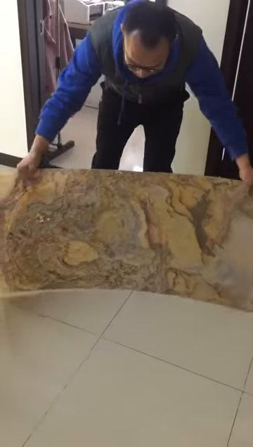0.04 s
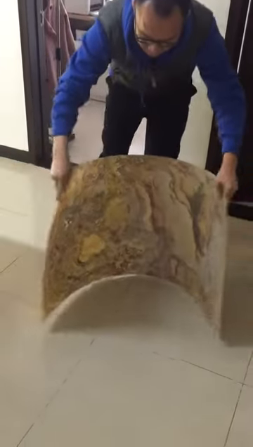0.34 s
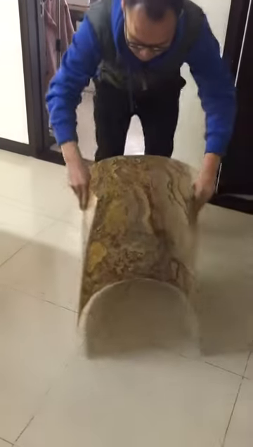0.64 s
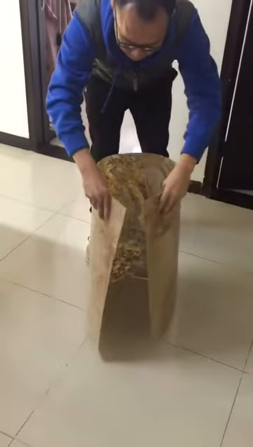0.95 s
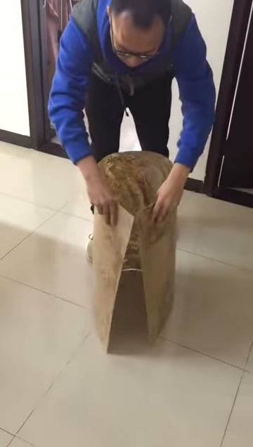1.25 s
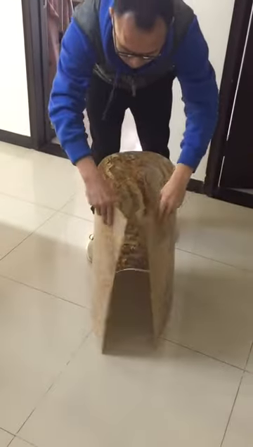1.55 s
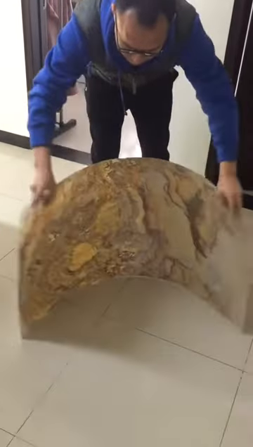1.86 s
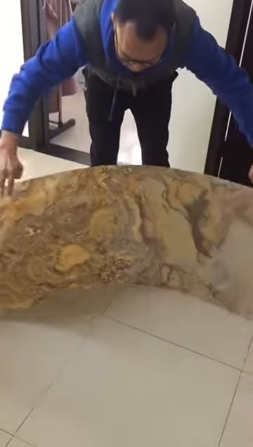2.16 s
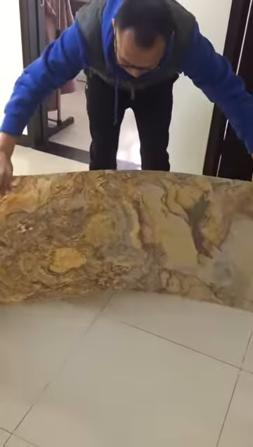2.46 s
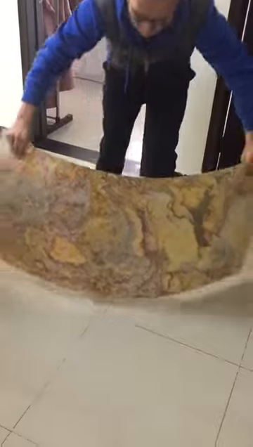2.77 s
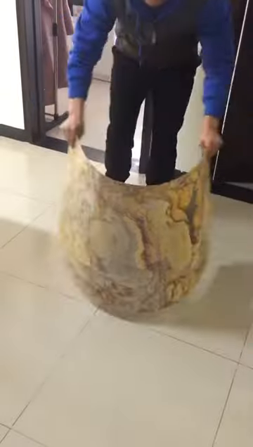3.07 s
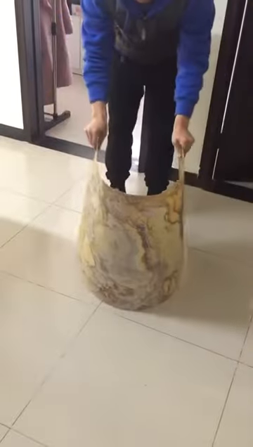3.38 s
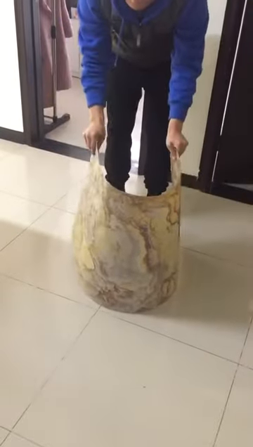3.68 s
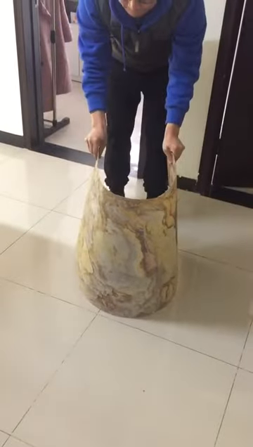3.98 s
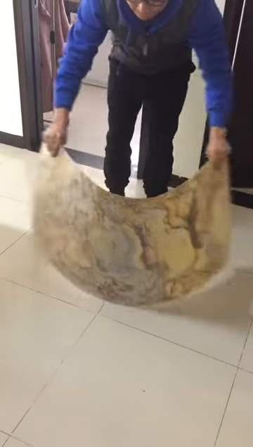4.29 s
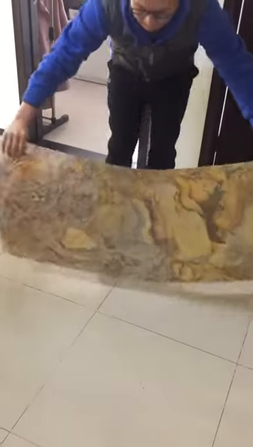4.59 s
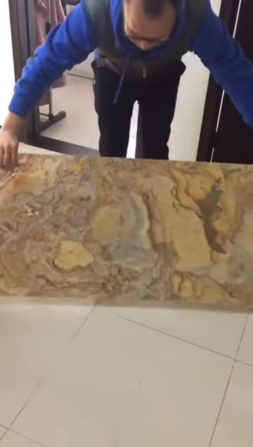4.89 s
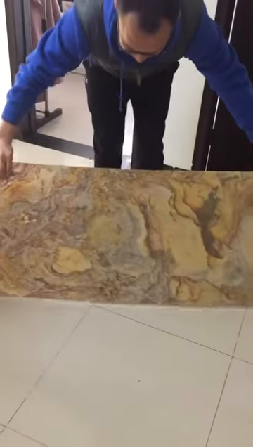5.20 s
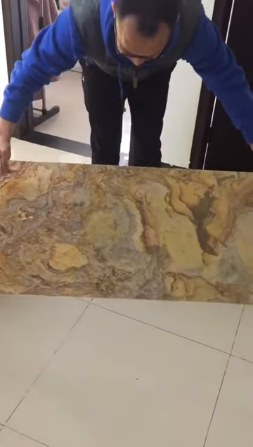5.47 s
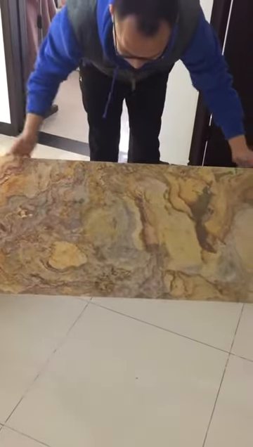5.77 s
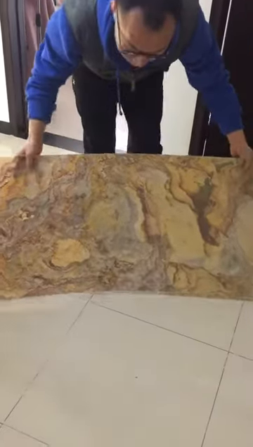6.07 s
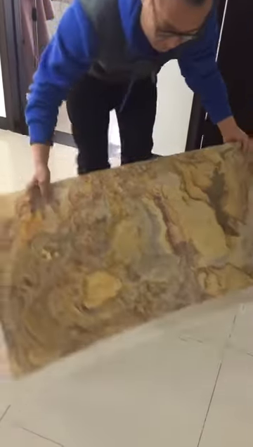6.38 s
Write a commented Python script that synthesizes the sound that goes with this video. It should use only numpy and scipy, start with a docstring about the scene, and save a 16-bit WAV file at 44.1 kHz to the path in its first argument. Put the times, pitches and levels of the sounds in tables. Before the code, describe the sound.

A thin sheet of stone veneer is bent by hand and slaps against itself, then unbends in a dense run of snaps, crackles and dull flops. After a low push of air comes one loud, ringing clack. Softer crackles, light scrapes and a knock on the tiles follow as it is laid flat. Everything is heard from across a hard, reverberant room.

```python
"""A thin sheet of stone veneer is bent into an arch, opened, bent the other way and laid flat.
It buckles with sharp snaps and soft flops, slaps against itself, crackles while it unbends,
and pushes air as it sways. Its edge scrapes and knocks on the tiles, hands slide on it,
and both the sheet and the hard, tiled room ring after every snap."""
import sys
import numpy as np
from scipy import signal
from scipy.fft import rfft, irfft
from scipy.io import wavfile

SR = 44100
rng = np.random.default_rng(int(sys.argv[2]) if len(sys.argv) > 2 else 0)


def master_out(mix):
    """Clip the mix to full scale and print it as 16-bit PCM to the path in sys.argv[1]."""
    frames = np.transpose(np.atleast_2d(mix))
    ceiling = np.clip(frames, -1, 1)
    pcm = np.round(ceiling * 32767).astype(np.int16)
    wavfile.write(sys.argv[1], SR, pcm)


N = 288414


def amp(db):
    """Turns decibels into a gain."""
    return 10 ** (np.asarray(db) / 20)


def unit(x):
    """Scales a signal to an average (rms) level of one."""
    return x / np.sqrt(np.mean(x ** 2) + 1e-20)


def read(points, hz):
    """Looks up a table by pitch, drawing smooth lines between its rows."""
    row_hz, value = np.transpose(points)
    return np.interp(np.log(hz + 1), np.log(row_hz + 1), value)


def colour(x, spectrum):
    """Shapes the bass and treble of a signal, at an rms level of one."""
    gain = amp(read(spectrum, np.fft.rfftfreq(len(x), 1 / SR)))
    return unit(irfft(rfft(x) * gain, len(x)))


def add(mix, start_s, sound):
    """Mixes a sound in at its start time."""
    part = mix[max(round(start_s * SR), 0):][:len(sound)]
    part += sound[:len(part)]


def grains(per_s, spread_db):
    """Random clicks of uneven size."""
    size = amp(spread_db * np.minimum(rng.exponential(1, N), 3))
    return size * rng.choice([-1, 1], N) * (rng.random(N) < per_s / SR)


def resonate(x, hz, width_hz):
    """A resonance that follows a changing pitch."""
    turn = np.exp(2j * np.pi * np.cumsum(hz) / SR)
    decay = np.exp(-np.pi * width_hz / SR)
    return (turn * signal.lfilter([1 - decay], [1, -decay], x / turn)).real


def burst(fade_s, size=4096):
    """Dying noise with an energy of one. A fade_s is always the time to fall by 60 dB."""
    noise = rng.standard_normal(size) * amp(-60 * np.arange(size) / SR / fade_s)
    return noise / np.linalg.norm(noise)


def pulse(spectrum):
    """The shortest sudden pulse with this two-sided spectrum, at an energy of one."""
    log_gain = np.log(spectrum / spectrum.max() + 1e-5)
    wave = np.fft.ifft(np.exp(np.conj(signal.hilbert(log_gain)))).real
    return wave / np.linalg.norm(wave)


def unevenness(depth_db, per_s):
    """A gain that catches and slips at random."""
    points = rng.standard_normal(1000)
    return amp(depth_db * np.interp(np.arange(N) * per_s / SR, np.arange(len(points)), points))


def swell(peak_s, rise_s, fall_s, down_db=-24.5):
    """A movement swells and fades; it is at down_db rise_s before its peak and fall_s after."""
    t, gain = np.arange(N) / SR - peak_s, np.zeros(N)
    on = (t > -2 * rise_s) & (t < 2 * fall_s)
    before = np.maximum(-t[on] / rise_s, 0) ** 1.38
    after = np.maximum(t[on] / fall_s, 0) ** 0.84
    gain[on] = amp(down_db * (before + after))
    return gain


def sliding(trim_db=-4, climb_octaves_per_s=1.7):
    """The edge and hands slide in tiny slips, with a rising tone and clumps of fizzing grit."""
    # each slide; tone_db is relative to its scrape:
    # peak_s, rise_s, fall_s, scrape_db, grit_db, tone_hz, tone_db, width_hz
    slides = [ (0.061, 0.16, 0.14, -40.5, -53, 1820, -36, 970),
              (1.18, 0.24, 0.19, -62.5, -66, 1960, 10, 1210),
              (1.41, 0.2, 0.052, -48.5, -79, 1901, 0, 952.6),
              (1.705, 0.063, 0.08, -31.5, -56, 1970, -4, 960),
              (1.94, 0.13, 0.35, -36.5, -50, 1700, -18, 940),
              (2.133, 0.053, 0.34, -43, -54, 1500, -4.5, 950),
              (2.345, 0.058, 0.22, -44.5, -51, 1530, -30, 960),
              (2.479, 0.071, 0.11, -57, -51.5, 1600, -5, 950),
              (3.079, 0.032, 0.036, -43.5, -60, 1640, -7.5, 700),
              (3.155, 0.038, 0.038, -51.5, -57, 2933, -5, 946),
              (4.088, 0.51, 0.85, -54, -86, 2260, -11, 705),
              (4.236, 0.089, 0.14, -48.5, -60.5, 1390, 2, 594),
              (4.42, 0.19, 0.2, -56.5, -64.5, 1630, -9, 200),
              (4.53, 0.092, 0.069, -42, -63, 1957, -0.5, 320),
              (4.604, 0.065, 0.042, -40.5, -54, 2290, -1, 910),
              (4.605, 0.018, 0.03, -39.5, -50.5, 3080, -2, 1510),
              (5.464, 0.026, 0.081, -33.5, -55, 1200, -9, 1000),
              (6.009, 0.094, 0.13, -44.5, -62, 1460, -25, 940),
              (6.465, 0.073, 0.12, -58.5, -83, 1117, -14, 950)]
    # tone of the scrape: pitch_hz, level_db
    scrape_tone = [(70, -11.5), (160, 4.5), (400, 1), (900, 4), (1600, -1.5), (2400, -6), (4000, -21),
                   (7000, -36.5), (12000, -80)]
    # tone of the grit: pitch_hz, level_db
    fizz_tone = [(1500, -16.5), (3000, 10.5), (4500, 3.5), (6000, 5), (7500, -0.5), (9500, 1.5),
                 (12000, -5.5)]
    t, out = np.arange(N) / SR, np.zeros(N)
    slips = grains(per_s=2500, spread_db=-3)
    grit = grains(per_s=1500, spread_db=5.5) * unevenness(depth_db=3.6, per_s=90)
    scrape, fizz = colour(slips, scrape_tone), colour(grit, fizz_tone)
    for peak_s, rise_s, fall_s, scrape_db, grit_db, tone_hz, tone_db, width_hz in slides:
        on = (t > peak_s - 2 * rise_s) & (t < peak_s + 2 * fall_s)
        edge_hz = tone_hz * 2 ** (climb_octaves_per_s * (t[on] - peak_s))
        tone = unit(resonate(resonate(slips[on], edge_hz, width_hz), edge_hz, width_hz))
        rub = amp(scrape_db) * (scrape[on] + amp(tone_db) * tone)
        out[on] += swell(peak_s, rise_s, fall_s)[on] * (rub + amp(grit_db) * fizz[on])
    return amp(trim_db) * out


def air(quiet_db=-59):
    """The swaying sheet gives a low push of air over the quiet of the building."""
    # each sway: peak_s, rise_s, fall_s, level_db
    sways = [(0.18, 0.4, 0.25, -47.5), (2.2, 0.33, 0.46, -42), (2.5, 0.43, 0.6, -45.5),
             (2.768, 0.057, 0.14, -28.5), (2.998, 0.11, 0.38, -53.5), (3.512, 0.017, 0.24, -44),
             (5.48, 0.057, 0.069, -42), (6.04, 0.099, 0.2, -42), (6.351, 0.54, 0.33, -57.5)]
    # tone of the pushed air: pitch_hz, level_db
    push_tone = [(20, -22.5), (42, 9), (62, -8.5), (85, 15), (110, 5), (150, 4), (220, -13), (400, -10.5),
                 (1000, -87.5)]
    # tone of the quiet building: pitch_hz, level_db
    quiet_tone = [(15, -42.5), (25, -11), (68, -11.5), (101, 2), (208, -8.5), (475, -18), (555, -18),
                  (682, -19), (883, -19), (1010, -22), (1920, -23.5), (9270, -39.5), (12000, -43),
                  (15600, -66), (22000, -120)]
    motion = sum(amp(level_db) * swell(*timing) for *timing, level_db in sways)
    push = motion * colour(rng.standard_normal(N), push_tone)
    return push + amp(quiet_db) * colour(rng.standard_normal(N), quiet_tone)


def buckle(level_db, low_hz, high_hz, crack_db, flutter_db=6):
    """One blow: a pulse, a flutter of bending waves between the edges, and a splintering crack."""
    # how well the sheet gives off sound: pitch_hz, level_db
    radiation = [(60, -21.5), (95, 6), (135, 13), (180, 5), (240, 6), (400, 1), (650, 4.5), (900, -1.5),
                 (1200, 3), (1520, 5), (2000, 2), (3000, -4.5)]
    # tone of the brittle crack: pitch_hz, level_db
    crack_tone = [(200, -4), (900, 4.5), (1600, 2.5), (3000, -4), (4300, -13), (5000, -23.5), (6000, -20.5),
                  (8000, -37.5), (12000, -50)]
    hz = np.maximum(abs(np.fft.fftfreq(4096, 1 / SR)), 1)
    band = 1 / np.hypot(1, (low_hz / hz) ** 2.74) / np.hypot(1, (hz / high_hz) ** 4.04)
    highpass = signal.butter(2, 800, "highpass", fs=SR)
    flutter = amp(flutter_db) * signal.lfilter(*highpass, burst(fade_s=0.04))
    flutter[0] = 1  # the blow itself
    body = signal.fftconvolve(pulse(band * amp(read(radiation, hz))), flutter)
    splinters = 4.8 * burst(fade_s=0.031)
    splinters[0] = 1  # the first break
    crack = signal.fftconvolve(pulse(amp(read(crack_tone, hz))), splinters / np.linalg.norm(splinters))
    return amp(level_db) * (body + amp(crack_db) * crack) * np.sqrt(.005 * SR)  # level over 5 ms


def flops(spread=1.45):
    """A wide part of the sheet flops over with a dull thump."""
    # each flop: start_s, level_db, pitch_hz
    thumps = [(0.016, -34.5, 196), (0.166, -34, 128), (0.248, -40.5, 170), (1.421, -33, 280.2),
              (1.456, -39.5, 260), (1.661, -28, 192), (1.688, -31, 151.2), (1.86, -26, 203),
              (1.893, -25, 171), (2.371, -32.5, 260), (2.42, -32, 125.4), (2.738, -24, 128),
              (2.772, -27, 139), (2.869, -37, 158), (3.522, -23.5, 180), (4.222, -41.5, 173),
              (4.244, -41.5, 174), (4.606, -40, 146), (5.293, -38, 155), (5.456, -34, 219.4),
              (5.886, -44, 177.5), (5.97, -39.5, 161.6), (6.209, -42, 148), (6.424, -46.5, 164.5)]
    out = np.zeros(N)
    for start_s, level_db, pitch_hz in thumps:
        add(out, start_s, buckle(level_db, pitch_hz / spread, pitch_hz * spread, crack_db=-53))
    return out


def slaps(clack_delay_s=.0031):
    """The folded sheet slaps itself: its face lands, its stiff edge clacks and the loop rebounds."""
    # each slap: start_s, face_db, edge_db, rebound_db, rebound_delay_s, edge_crack_db
    hits = [(0.6842, -21, -25, -37.5, 0.0073, -28.5), (1.312, -33, -39, -31.5, 0.01, -3.5),
            (3.492, -14, -20, -22, 0.01882, -5)]
    out = np.zeros(N)
    for start_s, face_db, edge_db, rebound_db, rebound_delay_s, edge_crack_db in hits:
        add(out, start_s, buckle(face_db, 203, 790, crack_db=-24.5))
        add(out, start_s + clack_delay_s, buckle(edge_db, 1100, 1610, edge_crack_db, flutter_db=-4))
        add(out, start_s + rebound_delay_s, buckle(rebound_db, 165, 393, crack_db=-37.5))
    return out


def ticks():
    """Chips of stone give tiny, high ticks."""
    # each chip: start_s, level_db
    chips = [(0.685, -64), (0.89, -62), (1.814, -51.5), (1.863, -58), (1.9017, -49), (1.934, -52),
             (1.972, -55.5), (2.111, -51), (2.127, -46.5), (2.344, -56), (3.4936, -44.5), (5.998, -66),
             (6.0306, -52)]
    out = np.zeros(N)
    for start_s, level_db in chips:
        add(out, start_s, buckle(level_db, 3880, 6900, crack_db=-6, flutter_db=-6))
    return out


def snaps():
    """The sheet snaps as it is released: a large buckle sounds low, a small one bright."""
    # each snap: start_s, level_db, low_hz, high_hz, crack_db, flutter_db
    buckles = [ (0.693, -33, 700, 2200, -16, -1), (0.727, -28, 151, 1600, -21, -5.5),
               (0.7305, -34.5, 300, 1850, -17, 3), (1.358, -50, 200, 1480, -18.5, -12.5),
               (1.396, -35, 150, 1370, -28, 6.5), (1.659, -36.5, 150, 1480, -3, 10),
               (1.687, -33, 150, 1565, 0, 8.5), (1.707, -31.5, 299, 2000, -21, 11),
               (1.728, -27.5, 180, 600, -10.5, -7), (1.757, -31.5, 400, 2070, -15, 1),
               (1.8125, -28.5, 900, 1660, 0.5, 1), (1.862, -24, 900, 1960, -1, 3),
               (1.868, -21.5, 900, 1760, -10.5, -1.5), (1.885, -27.5, 300, 1450, -12, 4.5),
               (1.903, -25, 1000, 1650, 1, 4), (1.9333, -19, 302, 1460, -10, -6.5),
               (1.9365, -21.5, 800, 1690, -9.5, -3), (1.943, -24, 200, 690, -10, -8),
               (1.952, -31.5, 300, 1810, -5, -6), (1.969, -22, 140, 1170, -10, -12.5),
               (2.03, -25, 430, 990, -12, -5), (2.068, -24.5, 350, 815, -11.5, 1.5),
               (2.078, -33.5, 430, 1037, -9, -4.5), (2.095, -25, 300, 853, -7.5, 3),
               (2.127, -20, 430, 686, -10.5, -2), (2.139, -21, 400, 675, -16.5, 2.5),
               (2.152, -26, 350, 696, -19.5, -4), (2.176, -25, 400, 737, -17, -5),
               (2.408, -36.5, 300, 1680, -9, 1.5), (2.418, -29.5, 199, 620, -31, 5),
               (2.453, -32.5, 453, 724, -27, 4.5), (3.527, -29.5, 1300, 1600, -9, -3.5),
               (3.534, -26.5, 140, 450, -14.5, -7), (4.199, -49, 300, 1500, -24, 7),
               (4.217, -44, 300, 1410, -17, 12.5), (4.230, -37.5, 500, 1410, -22, 0),
               (4.2375, -31.5, 600, 1450, -29, 1), (4.250, -35.5, 400, 1410, -16, -7),
               (4.567, -45, 200, 1413, -19.5, 7), (4.584, -46.5, 220.7, 1530, -20, 5),
               (5.2866, -55, 490, 1600, -11, -5), (5.465, -23.5, 200, 397, -12.5, -2),
               (5.488, -35.5, 129, 901, -11, -6), (5.975, -55, 300, 1200, -6, -3),
               (5.997, -47, 180, 1410, 4.5, -17), (6.031, -49.5, 450, 1580, 9.5, -5),
               (6.4236, -62, 400, 1750, -3, -1.5)]
    out = np.zeros(N)
    for start_s, *shape in buckles:
        add(out, start_s, buckle(*shape))
    return out


def crackle():
    """Many small buckles, dull and bright, come in surges as the sheet unbends."""
    # each surge, with relative levels: peak_s, rise_s, fall_s, level_db, bright_db
    surges = [(1.712, 0.065, 0.29, -20.5, -9), (1.95, 0.17, 0.27, -29.5, -20.5),
              (2.151, 0.2, 0.13, -25.5, -15.5), (2.434, 0.24, 0.1, -30.5, -20),
              (4.235, 0.021, 0.063, -35.5, -1)]
    # tone of the larger buckles: pitch_hz, level_db
    dull_tone = [(60, -52.5), (110, 6.5), (170, 4.5), (350, 2.5), (600, -10.5), (1000, -7.5), (2000, -22.5),
                 (5000, -55.5)]
    # tone of the smaller buckles: pitch_hz, level_db
    bright_tone = [(300, 6.5), (800, 25.5), (1400, 12.5), (2000, -6), (3000, -8), (5000, -41), (8000, -69),
                   (12000, -23)]
    dull = amp(-7) * colour(grains(per_s=130, spread_db=-0.5), dull_tone)
    bright = amp(-3) * colour(grains(per_s=300, spread_db=5), bright_tone)
    return sum(amp(level_db) * swell(*timing) * (dull + amp(bright_db) * bright)
               for *timing, level_db, bright_db in surges)


def knocks(attack_s=0.0018):
    """The stiff edge lands squarely and gives a short, rounded note."""
    # each landing: start_s, level_db, pitch_hz, fade_s
    landings = [(3.4943, -6.5, 1530, .028), (5.2868, -27, 560, .045)]
    t, out = np.arange(4096) / SR, np.zeros(N)
    attack = 1 - np.exp(-(t / attack_s) ** 2)
    for start_s, level_db, pitch_hz, fade_s in landings:
        add(out, start_s, amp(level_db - 60 * t / fade_s) * attack * np.sin(2 * np.pi * pitch_hz * t))
    return out


def sheet_ring(x, flat_db=-44, bending_s=0.16):
    """The sheet rings on when shaken; a tight bend stiffens it, so it rings louder and can go higher."""
    # the flat sheet's own notes: pitch_hz, relative_db, fade_s
    notes = [(275, -3.5, .6), (380, 0.5, .9), (408, 5.5, 1), (579, 2.5, .8), (748, 3, 0.88), (1490, 0, 1),
             (1540, 0, 1.1), (1560, 1, 0.9), (1605, 3.5, 1.3), (1660, 3, 1.3), (1700, 1, 1.6),
             (1770, 1.5, 1.2), (1830, -0.5, 1.2), (2150, 3, 1.3)]
    # times it is held tightly bent: start_s, end_s, ring_db, pitch_factor
    bends = [(.68, 1.601, -33.5, 1.02), (3.35, 4.098, -30.5, 1.0)]
    t, now = np.arange(SR) / SR, np.arange(N) / SR
    shapes, out = [], x.copy()
    for start_s, end_s, ring_db, pitch_factor in bends:
        held = np.interp(now, [start_s - bending_s, start_s, end_s, end_s + bending_s], [0, 1, 1, 0])
        shapes.append((amp(ring_db) * held, pitch_factor))
    for gain, pitch_factor in shapes + [(amp(flat_db), 1)]:
        ring = sum(amp(db - 60 * t / fade_s) * np.sin(2 * np.pi * hz * pitch_factor * t) / fade_s ** .5
                   for hz, db, fade_s in notes)
        out += signal.fftconvolve(x * gain, ring / np.linalg.norm(ring))[:N]
    return out


def reflections(build_s=0.0017, dull_hz=1800):
    """Dull echoes from walls and furniture, and a smooth tail whose treble dies early."""
    # how long the room rings: pitch_hz, fade_s
    fades = [(80, 0.17), (170, 0.92), (500, 1), (1500, 0.76), (2700, 0.7), (5000, 0.47), (11000, 0.14)]
    # tone of the tail: pitch_hz, level_db
    tail_tone = [(60, -7), (125, 2), (180, 2.5), (220, -1), (330, 5), (460, -6), (600, 0.5), (1500, 3),
                 (4000, 6.5), (11000, 9)]
    # bounces off walls and furniture: delay_s, gain
    echoes = [(0.0099, 0.11), (0.016, 0.21), (0.034, 0.24), (0.044, 1)]
    hz, t, bands = signal.stft(rng.standard_normal(SR), SR, nperseg=256)
    bands *= amp(-60 * t / read(fades, hz)[:, None]) * (1 - np.exp(-(t / build_s) ** 2))
    bands *= amp(read(tail_tone, hz))[:, None]
    tail = signal.istft(bands, SR, nperseg=256)[1]
    tail /= np.sqrt(np.mean(abs(rfft(tail, SR)[300:3000]) ** 2))  # gain of one over 300-3000 Hz
    walls = np.zeros(len(tail))
    for delay_s, gain in echoes:
        add(walls, delay_s, gain * burst(fade_s=0.051))
    return tail + signal.lfilter(*signal.butter(2, dull_hz, fs=SR), walls)


def room(x, floor_s=.0034, floor_gain=0.14, pose_s=.08, patterns=7):
    """The floor echo and the room's notes stay put; the reflections change as the sheet moves."""
    # the room's own notes (standing waves): pitch_hz, peak_db, fade_s
    notes = [(83.7, 8, 0.91), (99.8, 2, 1), (138.6, 10.5, 0.69), (166.6, 8.5, 0.98), (180.8, 10.5, 0.44),
             (295.4, 10, 0.72), (377.8, 11, 0.6), (407, 8.5, 0.54), (507, 5.5, 0.54), (519, 4.5, 0.49),
             (633, 0.5, 0.91)]
    # sound beamed at the walls, less when the sheet faces the listener: time_s, level_db
    aim = [(0.2, -3), (0.7, -1), (1.3, 0), (1.72, 0), (1.9, -2.5), (2.13, -2.5), (2.45, -1), (3.5, -2),
           (4.24, -3.5), (4.6, -3), (5.47, -3), (6.0, -1.5)]
    t, now = np.arange(SR) / SR, np.arange(N) / SR
    steady = sum(amp(db - 60 * t / fade_s) * np.cos(2 * np.pi * hz * t) / fade_s
                 for hz, db, fade_s in notes)
    steady *= 2 * np.log(1000) / SR  # makes each note peak at its peak_db
    steady[0] += 1  # the direct sound
    steady[round(floor_s * SR)] += floor_gain
    out = signal.fftconvolve(x, steady)[:N]
    sent = x * amp(np.interp(now, *np.transpose(aim)))
    for k in range(patterns):  # each pattern of echoes blends into the next
        share = np.sin(np.pi / 2 * np.minimum((now / pose_s - k) % patterns, 2))
        out += signal.fftconvolve(sent * share, reflections())[:N]
    return out


def scene():
    """All the sounds of the sheet, heard from across the room."""
    sheet = snaps() + slaps() + flops() + ticks() + knocks() + crackle() + sliding()
    return (room(sheet_ring(sheet)) + air())[None]


def record(dry, low_hz=34, high_hz=11900):
    """Cuts away the deepest rumble and the highest treble."""
    highpass = signal.butter(4, low_hz, "highpass", fs=SR, output="sos")
    lowpass = signal.firwin(401, high_hz, window=("kaiser", 8), fs=SR)
    return signal.oaconvolve(signal.sosfilt(highpass, dry), lowpass[None], "same")


dry = scene()
out = record(dry)
master_out(out)
```